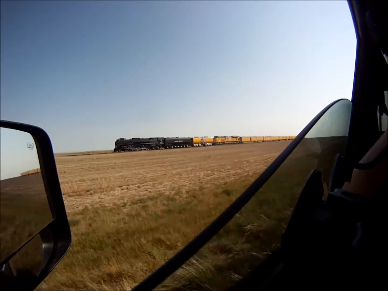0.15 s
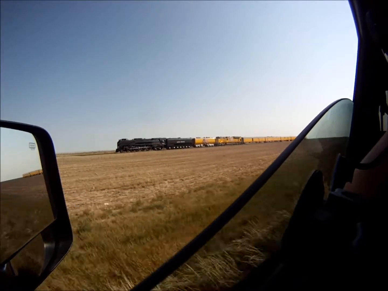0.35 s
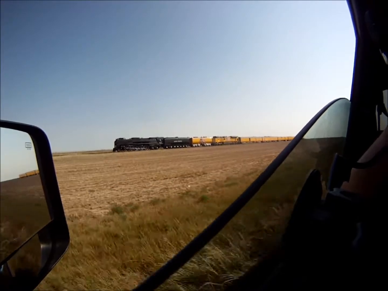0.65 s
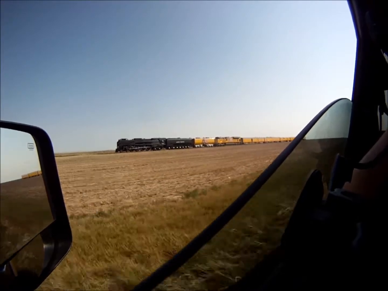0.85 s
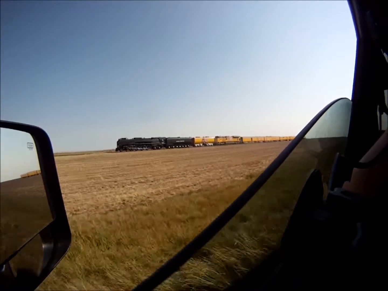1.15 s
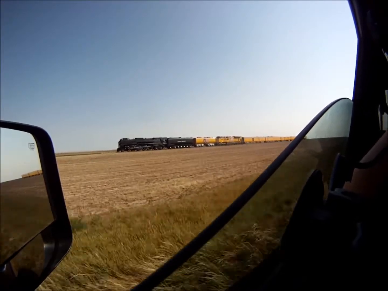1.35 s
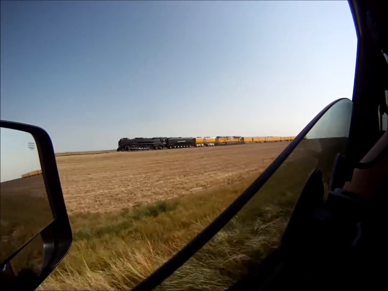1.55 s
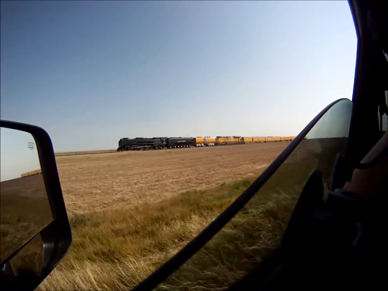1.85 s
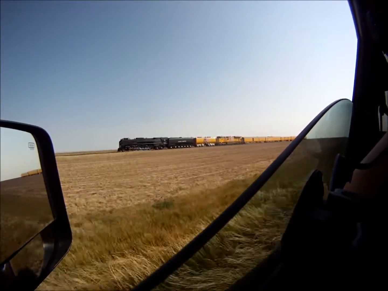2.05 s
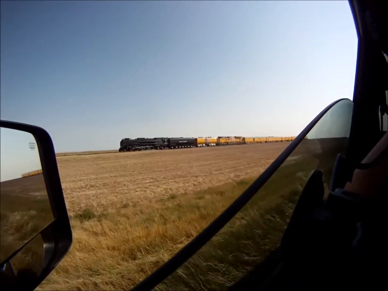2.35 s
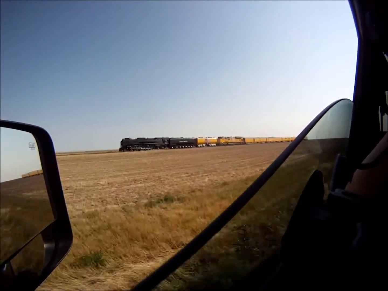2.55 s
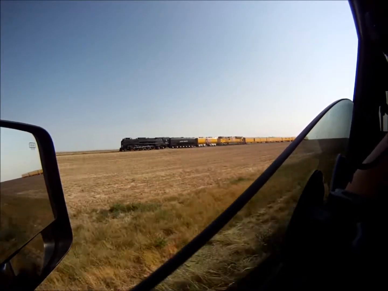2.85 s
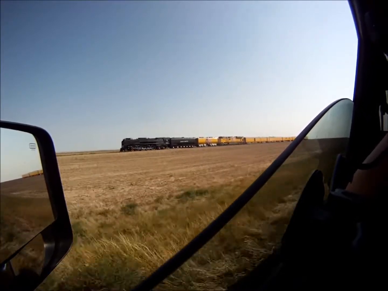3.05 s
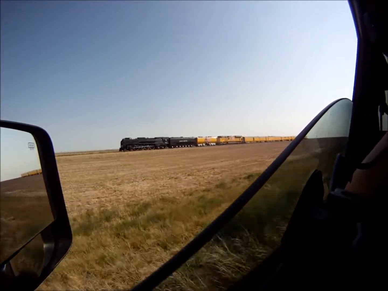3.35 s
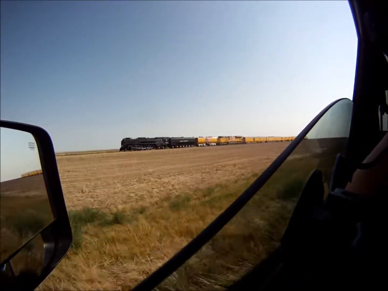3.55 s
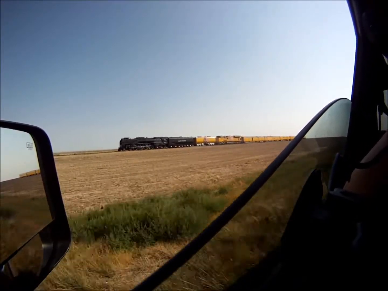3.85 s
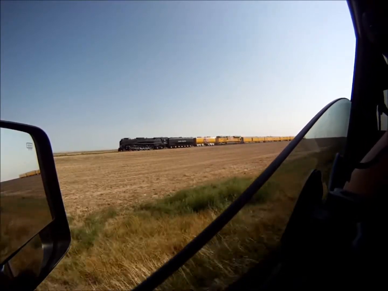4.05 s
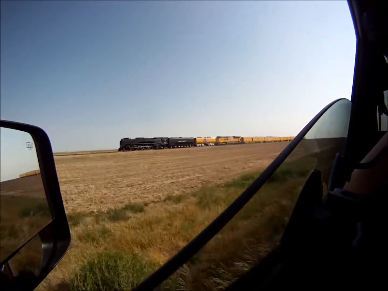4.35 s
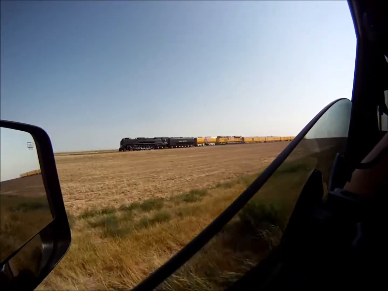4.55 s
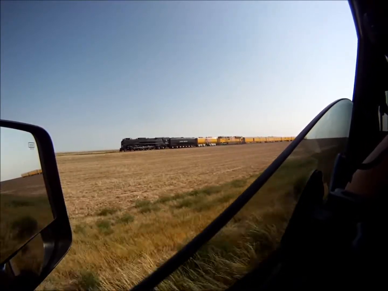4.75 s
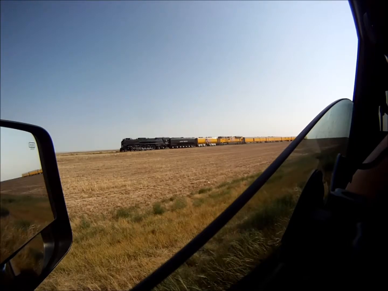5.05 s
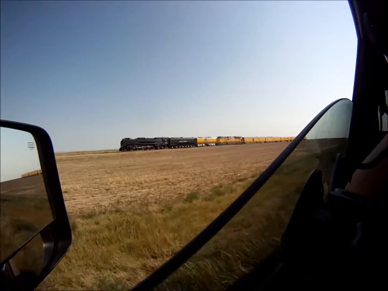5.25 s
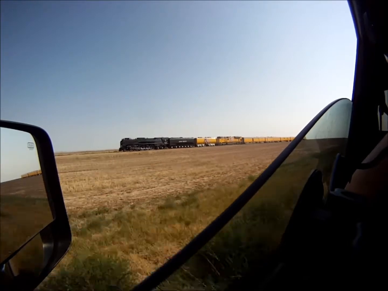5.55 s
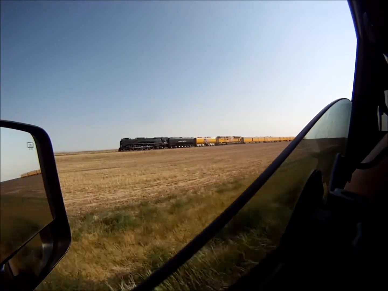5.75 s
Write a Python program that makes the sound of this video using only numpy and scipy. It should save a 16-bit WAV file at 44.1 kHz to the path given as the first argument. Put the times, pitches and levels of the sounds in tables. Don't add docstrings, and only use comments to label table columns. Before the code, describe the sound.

For about six seconds we are inside a fast car with a window partly open. Very deep wind rumble dominates, broken by irregular slaps of air, dense from 0.2 to 1.4 s, then strong near 2.0, 2.8, 3.3, 3.7 and 4.7 s. Under it runs steady low-mid tyre roar and boxy cabin boom, changing with the road and rougher around 2.5 s. A low engine hum wavers in and out, with very faint gear whine. Wind rush, hiss and a thin high seal whistle stay well behind. Loose panels rattle softly; grit ticks at 0.9 s and hits hardest at 2.55 s. Brief faint squeaks cluster at 1.2-1.4, 2.0, 2.3-2.6, 3.7-4.0 and 5.1-5.2 s. The small camera microphone squashes peaks, ducks briefly, especially just after 0.96 s, and gives a coarse, grainy treble. The ride continues to the end, without train sound.

```python
import sys
import numpy as np
from scipy import signal
from scipy.fft import rfft, irfft
from scipy.io import wavfile
from scipy.ndimage import uniform_filter1d

SR = 44100
rng = np.random.default_rng(int(sys.argv[2]) if len(sys.argv) > 2 else 0)


def gain_from_decibels(decibels):
    exponent = np.asarray(decibels, float) / 20
    return 10 ** exponent


def generate_wav(sig):
    pcm = np.round(np.clip(np.atleast_2d(sig).T, -1, 1) * 32767).astype(np.int16)
    wavfile.write(sys.argv[1], SR, pcm)


N = 261072


def evened(x):
    return x / np.sqrt(np.mean(x ** 2) + 1e-20)


def drift(top_hz):
    z = rfft(rng.standard_normal(N))
    hz = np.fft.rfftfreq(N, 1 / SR)
    return evened(irfft(z / (1 + (hz / top_hz) ** 2), N))


def resonate(x, hz, width):
    turn = np.exp(2j * np.pi * hz * np.arange(len(x)) / SR)
    r = np.exp(-np.pi * width / SR)
    smooth = signal.lfilter([1 - r], [1, -r], x / turn)
    return 2 * (turn * smooth).real


def turbulence(spectrum, size, patchy_db, flicker_db, flicker_hz):
    frames = 4 * N // size + 5
    hz = np.fft.rfftfreq(size, 1 / SR)
    a, b, patches = rng.standard_normal((frames, len(hz), 3)).T
    patches = uniform_filter1d(patches, size=size // 128, axis=0)
    patches = evened(uniform_filter1d(patches, size=6, axis=1))
    f, db = np.transpose(spectrum)
    shape_db = np.interp(np.log(hz + 1), np.log(f + 1), db, left=-120, right=-120)
    z = (a + 1j * b) * gain_from_decibels(shape_db[:, None] + patchy_db * patches)
    noise = signal.istft(z, nperseg=size, noverlap=3 * size // 4)[1][:N]
    return evened(noise * gain_from_decibels(flicker_db * drift(flicker_hz)))


def swells(s, length, lift_db):
    t = np.arange(0, N + 64, 64) / SR
    bells = np.exp(-((t[:, None] - s) / (.5 * length)) ** 2)
    return np.interp(np.arange(N) / SR, t, (lift_db * bells).sum(axis=1))


def gusts(bright_share):
    # centre t/s, length/s, lift/dB, brightness/-1 to 1
    gust_table = [(.005, 0.023, 7, .5), (.14, 0.14, 4, -0.13), (0.294, 0.16, 2.5, 0.11),
                  (.53, 0.13, 4, 0.29), (.9, 0.21, 5, 0.32), (1.113, .08, 3.5, 0.4), (1.327, .14, 4, 0.036),
                  (1.71, .4, 3.5, 0.54), (1.99, 0.088, 4, 0.43), (2.19, 0.3, 2.5, 0),
                  (2.345, .1, 2.5, -0.2), (2.42, 0.045, -2, .6), (2.515, 0.14, 6.5, .1), (2.64, 0.11, 2, 0),
                  (2.94, 0.091, 5, -0.075), (3.252, .05, -4.5, .5), (3.317, .06, 5, -.2),
                  (3.508, 0.13, 2, 0.24), (3.662, 0.19, 2.5, -0.11), (3.89, 0.08, 3.5, 0.66),
                  (4.075, 0.088, 0, 0.58), (4.32, 0.13, 1.5, .2), (4.555, .2, 2.5, 0),
                  (4.843, 0.18, 3, 0.23), (5.17, 0.13, 4.5, 0.16), (5.45, 0.099, 3.5, .3),
                  (5.606, .08, 2.5, -0.11), (5.906, 0.1, 5, .4)]
    s, length, lift_db, bright = np.transpose(gust_table)
    return swells(s, length, lift_db * (1 + bright_share * bright))


def road():
    # centre t/s, length/s, lift/dB
    stretches = [(0.068, 0.071, 2), (0.236, 0.15, 3.5), (0.555, 0.11, 1.5), (0.86, 0.049, 4),
                 (1.32, 0.13, 2.5), (1.795, 0.23, 1.5), (1.956, 0.069, 1), (2.29, 0.18, 3),
                 (2.528, 0.061, 6), (2.782, 0.034, 5), (2.913, 0.083, 0.5), (3.013, 0.028, -3.5),
                 (3.72, 0.049, -2), (4.404, 0.58, 1), (4.597, 0.12, 1.5), (4.853, 0.086, 2),
                 (5.113, 0.067, 4.5), (5.59, 0.094, 3), (5.652, 0.037, -5), (5.754, 0.052, -2.5),
                 (5.904, 0.083, 3)]
    return swells(*np.transpose(stretches))


def buffet():
    # f/Hz, level/dB per Hz
    buffet_spectrum = [(4.7, -29), (8.0, -11), (33, 5.5), (110, -5.5), (140, -61), (240, -120)]
    return gain_from_decibels(-20) * turbulence(buffet_spectrum, size=8192, patchy_db=-0.25, flicker_db=0.1, flicker_hz=9.)


def boom():
    # f/Hz, level/dB per Hz
    boom_spectrum = [(44, -32), (75, -2), (119, -1.5), (151, -5.5), (181, -1.5), (241, -14), (270, -11.5),
                     (350, -25), (590, -120)]
    # centre t/s, length/s, lift/dB
    boom_changes = [(.2, .1, 1), (0.623, .06, 2), (.36, 0.048, -1), (1.134, 0.1, -11), (1.963, 0.081, 4),
                    (2.47, 0.11, -1), (2.78, 0.045, 3), (3.298, 0.041, 9), (3.722, 0.21, 4.5), (4.272, 0.078, 4),
                    (4.33, .05, -10), (4.41, .06, 0.5), (5.04, 0.056, 4), (5.09, .05, -5.5), (5.55, 0.2, -3.5)]
    level_db = -23.5 + 0.31 * road() + swells(*np.transpose(boom_changes))
    return gain_from_decibels(level_db) * turbulence(boom_spectrum, size=4096, patchy_db=-0.63, flicker_db=0.37, flicker_hz=7.4)


def roar():
    # f/Hz, level/dB per Hz
    roar_spectrum = [(140, -9.5), (230, -11.5), (252, -14.5), (312, -5.5), (393, 0.5), (481, -1.5),
                     (613, -8), (840, -26), (1090, -52), (1850, -120)]
    level_db = -25 + road() + 0.19 * gusts(0)
    return gain_from_decibels(level_db) * turbulence(roar_spectrum, size=2048, patchy_db=-0.01, flicker_db=0.35, flicker_hz=22.1)


def rush():
    # f/Hz, level/dB per Hz
    rush_spectrum = [(480, -9), (820, -3), (858, -5.5), (1010, -2), (1190, -7.5), (1600, -14), (2080, -35),
                     (3520, -120)]
    level_db = -47.5 + gusts(-1.5)
    return gain_from_decibels(level_db) * turbulence(rush_spectrum, size=1024, patchy_db=0.0, flicker_db=0.0, flicker_hz=25.)


def hiss():
    # f/Hz, level/dB per Hz
    hiss_spectrum = [(850, -5), (1450, -7), (1910, -5.5), (2160, 0), (2350, -4.5), (2700, -4),
                     (3280, -11.5), (3550, -13), (3850, -13), (5000, -49), (8470, -120)]
    level_db = -51.5 + gusts(0.33)
    return gain_from_decibels(level_db) * turbulence(hiss_spectrum, size=1024, patchy_db=1.14, flicker_db=-0.1, flicker_hz=25.)


def engine():
    # t/s, level/dB of the firing tone
    exhaust = [(0.0, -35), (0.6, -32.5), (1.07, -22), (1.4, -39), (1.83, -22), (2.0, -31), (2.82, -23.5),
               (3.3, -34), (3.6, -20.5), (4.2, -23.5), (4.3, -29.5), (5.08, -28), (5.2, -35), (5.92, -26)]
    # multiple of the firing rate, level/dB rms
    gear_whine = [
        (12, -69),
        (16, -63),
        (20, -70.5),
    ]
    firing_hz = 131.05
    turns = np.cumsum(firing_hz * (1 + 0.001195 * drift(1.167))) / SR
    s, db = np.transpose(exhaust)
    exhaust_gain = gain_from_decibels(np.interp(np.arange(N) / SR, s, db))
    out = exhaust_gain * gain_from_decibels(2.9 * drift(13.0) - 1.0) * np.sin(2 * np.pi * turns)
    for k, whine_db in gear_whine:
        whine = np.sin(2 * np.pi * (k * turns + rng.random()))
        out += np.sqrt(2) * gain_from_decibels(whine_db + 1.7 * drift(5.4)) * whine
    return out


def whistle():
    turns = np.cumsum(3895 * (1 + .003 * drift(6.6))) / SR
    level_db = -71 + 1.6 * gusts(1) + 4.5 * drift(13.0)
    return gain_from_decibels(level_db) * np.sin(2 * np.pi * turns)


def trim():
    # f/Hz, width/Hz, level/dB
    panels = [
        (2180, 170, 3),
        (990, 73, 11.5),
        (2680, 51, -9.5),
        (3120, 50, -4.5),
        (3480, 120, -2),
    ]
    knocks_per_s = 260
    shake = gain_from_decibels(6.5 * drift(8.4))
    strength = gain_from_decibels(1.9 * np.minimum(rng.exponential(1, N), 5))
    knocks = strength * (rng.random(N) < shake * knocks_per_s / SR)
    struck = rng.integers(0, len(panels), N)
    rings = np.zeros(N)
    for k, (hz, width, db) in enumerate(panels):
        rings += gain_from_decibels(db) * evened(resonate(knocks * (struck == k), hz, width))
    return gain_from_decibels(-63.5) * rings


def slaps():
    # centre t/s, peak level/dB, f/Hz
    slap_table = [(0.232, -2, 55.5), (0.364, -2.5, 49), (0.514, -4, 50), (0.594, -8.5, 69.6),
                  (0.782, -6, 75.4), (0.96, -5.5, 35), (1.123, -5, 32), (1.254, -8, 46), (1.332, -13, 58),
                  (1.408, -4.5, 67), (1.66, -12, 58), (2.024, -5, 32), (2.383, -6, 41), (2.499, -6, 93),
                  (2.783, -4, 41), (2.868, -10, 34), (3.004, -5.5, 57.5), (3.159, -10.5, 50),
                  (3.321, -3.5, 38.8), (3.511, -9, 47.6), (3.698, -4, 41), (4.04, -6.5, 30),
                  (4.515, -12, 43), (4.616, -9.5, 45), (4.735, -3, 38), (4.887, -11, 64), (4.962, -10, 34),
                  (5.249, -7.5, 51), (5.482, -10, 37), (5.646, -12, 42.6)]
    out = np.zeros(N + 8000)
    t = np.arange(-4000, 4000) / SR
    for s, db, hz in slap_table:
        fade = np.exp(-(t * np.clip(hz, 30, 70) / 0.5) ** 2)
        push = np.cos(2 * np.pi * hz * t + 2.52) * fade
        out[round(s * SR):][:len(t)] += gain_from_decibels(db - 3.5) * push
    return out[4000:][:N]


def ticks():
    # t/s, peak level/dB, ring f/Hz, ring level/dB
    grit = [
        (.880, -26.5, 1000, -2),
        (1.160, -36, 1000, -1),
        (1.287, -32, 1030, -3),
        (2.5465, -29, 1980, -4),
        (2.5515, -33, 1500, -4),
        (2.548, -18, 936, -6.5),
        (2.8393, -39, 990, 0),
    ]
    out = np.zeros(N)
    t = np.arange(1500) / SR
    for s, db, hz, ring_db in grit:
        knock = (t / 0.00063 * np.exp(1 - t / 0.00065)) ** 2 * np.cos(2 * np.pi * 0.88 * hz * t)
        ring_gain = np.minimum(t / 0.0011, 1) * gain_from_decibels(ring_db - 60 * t / 0.019)
        ring = ring_gain * np.sin(2 * np.pi * hz * t)
        out[round(s * SR):][:len(t)] += gain_from_decibels(db) * (knock + ring)
    return out


def squeaks():
    # centre t/s, f/Hz, length/s, level/dB
    squeak_table = [(1.158, 3480, .02, -58), (1.218, 3600, .018, -52), (1.254, 2680, .02, -55),
                    (1.326, 2780, .015, -53), (1.377, 3450, .02, -55), (1.43, 3120, 0.028, -58),
                    (1.965, 3050, .06, -55), (2.57, 2150, .02, -52), (2.003, 2150, .04, -59),
                    (2.328, 2150, 0.04, -54), (2.35, 3470, .03, -59), (2.42, 2150, .03, -57),
                    (2.465, 2180, .016, -48), (2.495, 2190, .016, -47), (2.48, 3470, 0.022, -54),
                    (3.72, 2150, .05, -57), (3.879, 2240, 0.074, -54), (3.94, 2220, .04, -56),
                    (4.035, 3550, .02, -71), (5.136, 3480, 0.023, -55), (5.196, 3480, 0.021, -58)]
    out = np.zeros(N)
    rub = 1 + 0.56 * drift(120.)
    slip = drift(124.0)
    for s, hz, length, db in squeak_table:
        at = round((s - length / 2) * SR) + np.arange(round(length * SR))
        turns = np.cumsum(hz * (1 + .045 * slip[at])) / SR
        out[at] += gain_from_decibels(db + 5.5) * rub[at] * np.hanning(len(at)) * np.sin(2 * np.pi * turns)
    return out


def scene():
    wind = buffet() + slaps() + rush() + hiss() + whistle()
    car = boom() + roar() + engine() + trim() + ticks() + squeaks()
    return (wind + car)[None]


def ducking():
    # t/s, depth/dB
    ducks = [
        (0.0, -5),
        (.965, -8.5),
        (1.125, -1.5),
        (2.39, -1.5),
        (2.73, -2.5),
        (3.33, -2.5),
        (3.70, -5),
        (4.0, -2.5),
        (5.27, 0),
    ]
    fall_s, recover_s = 0.014, 0.047
    t, db = np.arange(N) / SR, np.zeros(N)
    for s, depth_db in ducks:
        since = np.maximum(t - s, 0)
        db += depth_db * np.minimum(since / fall_s, 1) * np.exp(-since / recover_s)
    return gain_from_decibels(db)


def roll_off(x):
    return signal.sosfilt(signal.butter(12, 15750, fs=SR, output="sos"), x)


def record(dry):
    held_per_s = 8000
    peak_db = 20 * np.log10(abs(dry[0]) + 1e-6)
    fall = np.arange(N) * 60. / SR
    over_db = np.maximum(np.maximum.accumulate(peak_db + fall) - fall + 8.5, 0)
    limit = gain_from_decibels(0.55 * uniform_filter1d(over_db, size=90))
    ducked = np.clip(gain_from_decibels(1.03) * ducking() * dry / limit, -.6, .6)
    low_cut = signal.lfilter(*signal.butter(1, 12., "high", fs=SR), ducked)
    guard = signal.firwin(801, 3930, window=("kaiser", 5), fs=SR)
    guarded = .45 * signal.oaconvolve(low_cut, guard[None], "same") + .55 * low_cut
    slow = signal.resample_poly(guarded, held_per_s, SR, axis=1, window=("kaiser", 9))
    steps = np.repeat(slow, 6, axis=1)
    held = signal.resample_poly(steps, SR, 6 * held_per_s, axis=1)[:, :N]
    edge = signal.firwin(2047, 15290, window=("kaiser", 4), fs=SR)
    return roll_off(signal.oaconvolve(held, edge[None], "same"))


dry = scene()
out = record(dry)
generate_wav(out)
```